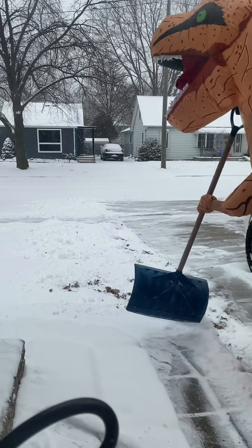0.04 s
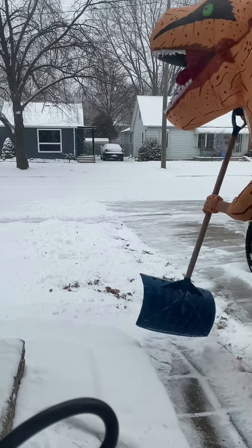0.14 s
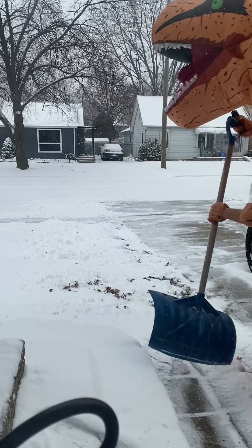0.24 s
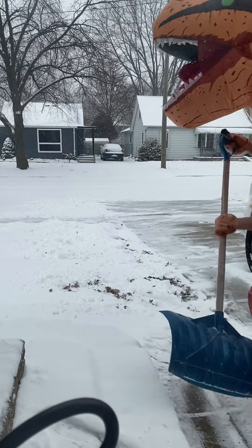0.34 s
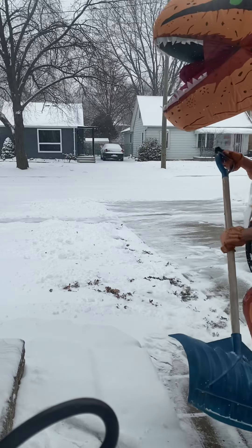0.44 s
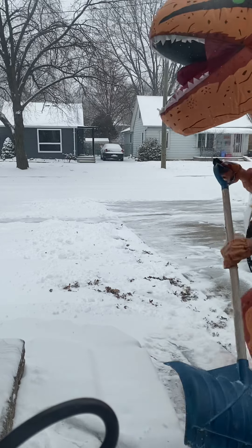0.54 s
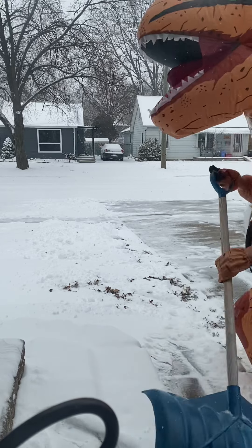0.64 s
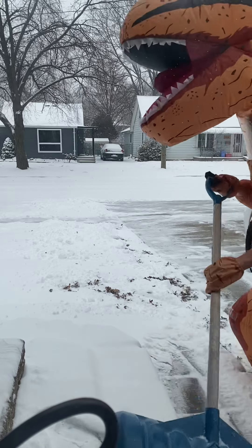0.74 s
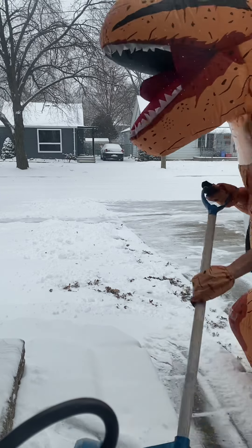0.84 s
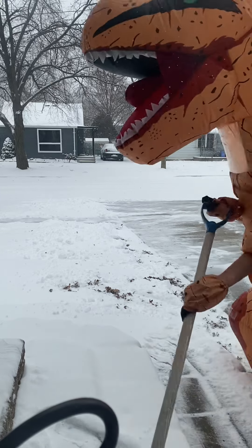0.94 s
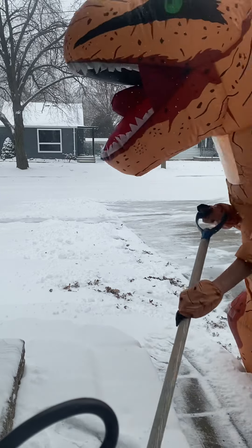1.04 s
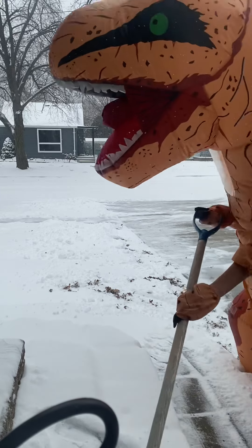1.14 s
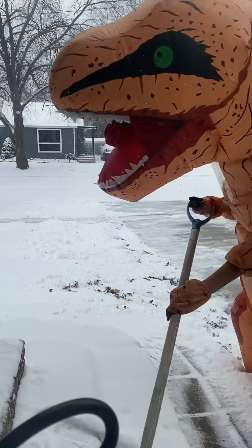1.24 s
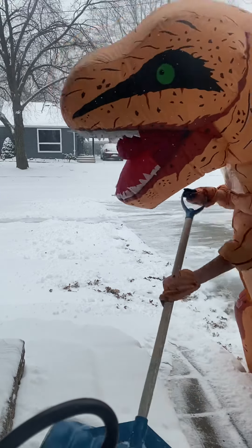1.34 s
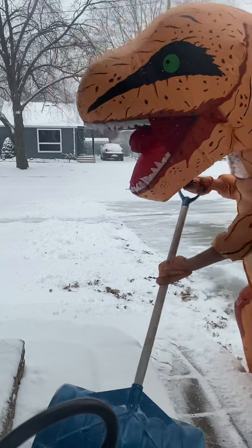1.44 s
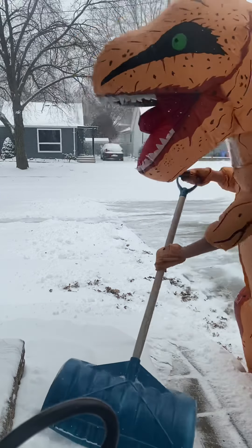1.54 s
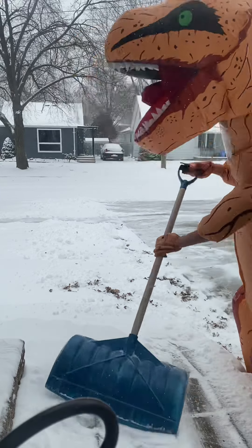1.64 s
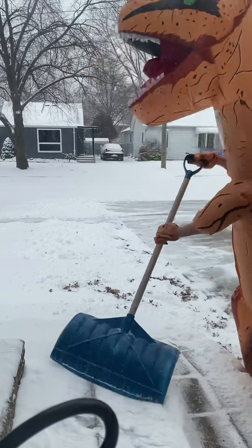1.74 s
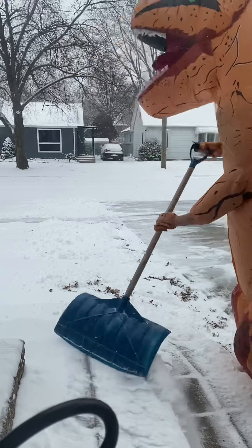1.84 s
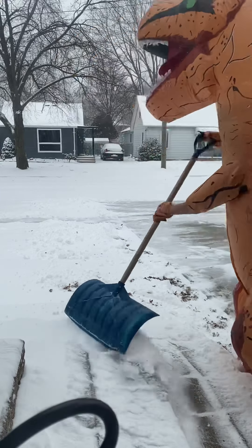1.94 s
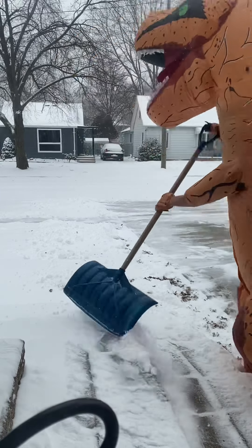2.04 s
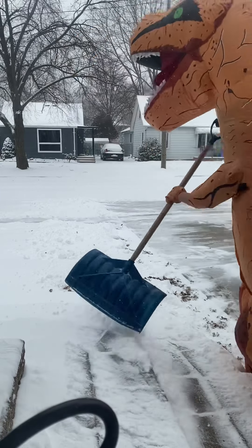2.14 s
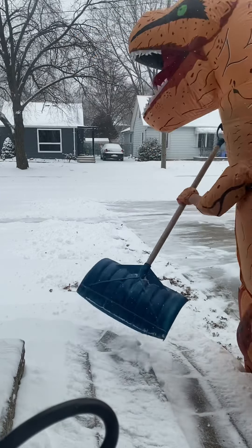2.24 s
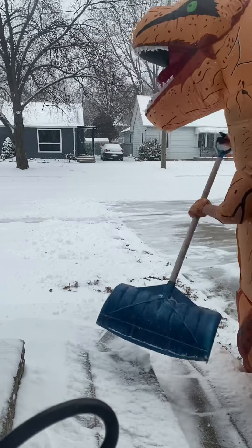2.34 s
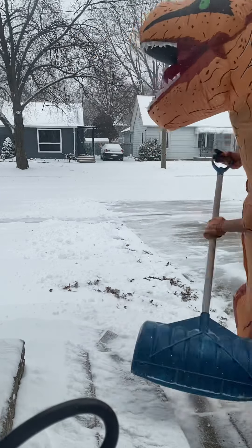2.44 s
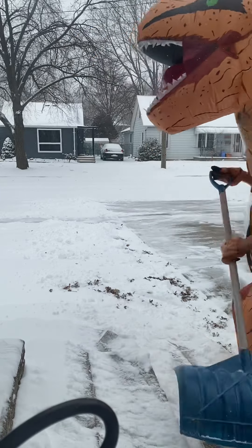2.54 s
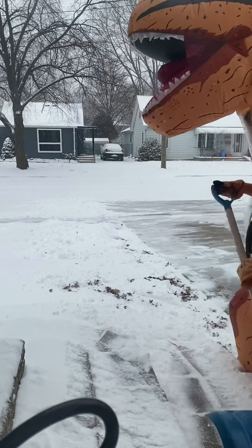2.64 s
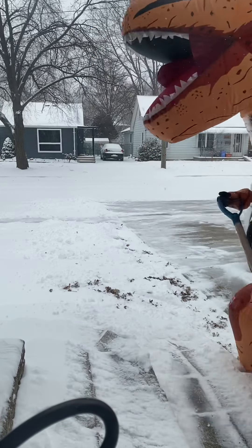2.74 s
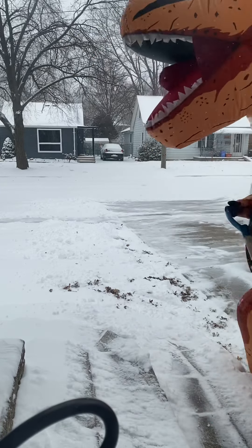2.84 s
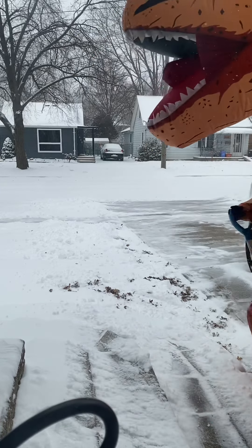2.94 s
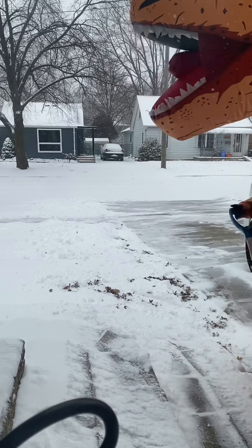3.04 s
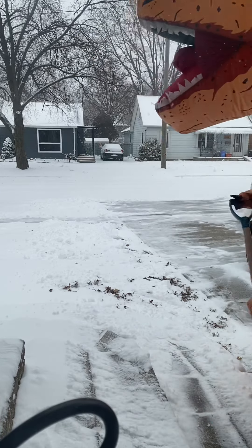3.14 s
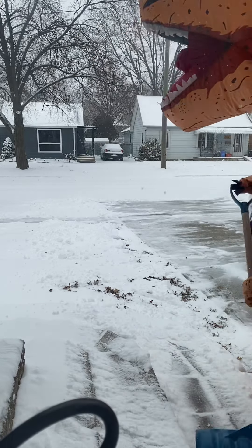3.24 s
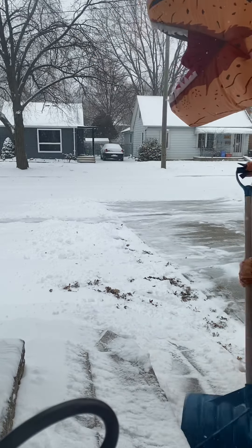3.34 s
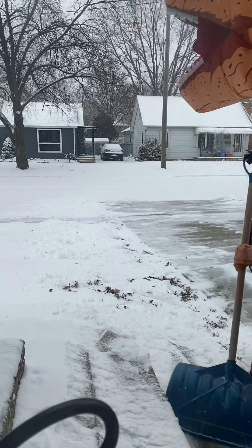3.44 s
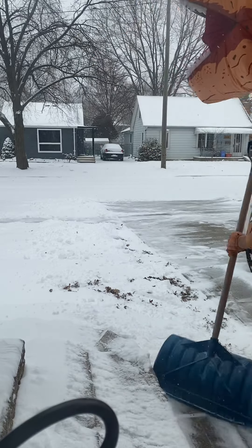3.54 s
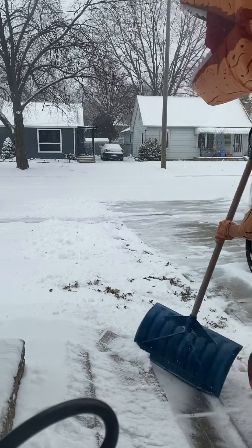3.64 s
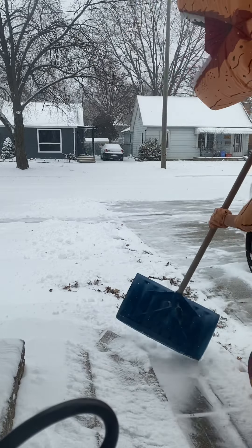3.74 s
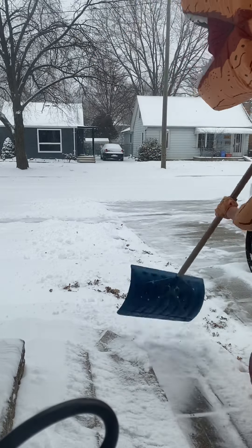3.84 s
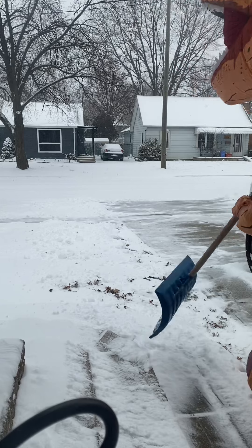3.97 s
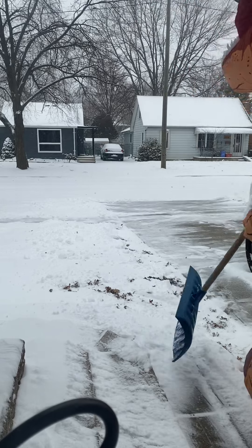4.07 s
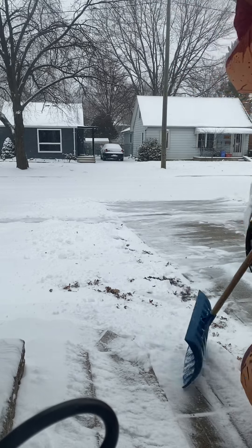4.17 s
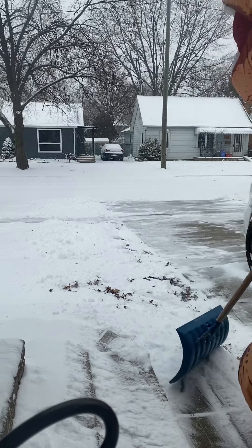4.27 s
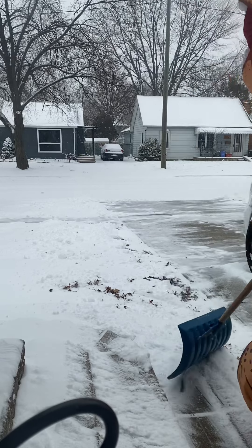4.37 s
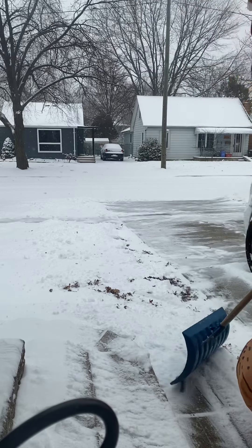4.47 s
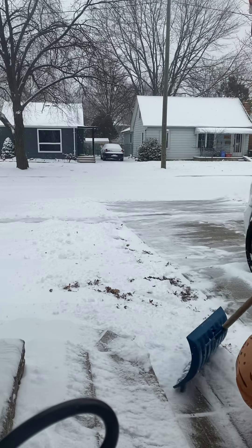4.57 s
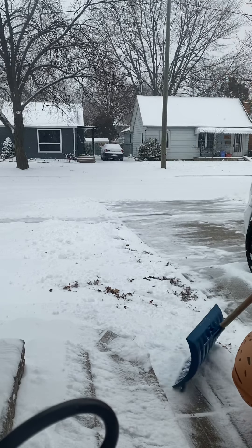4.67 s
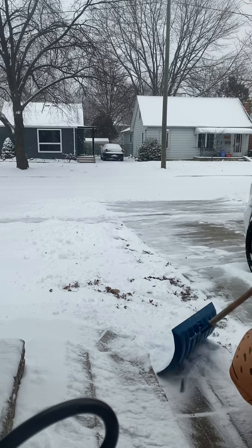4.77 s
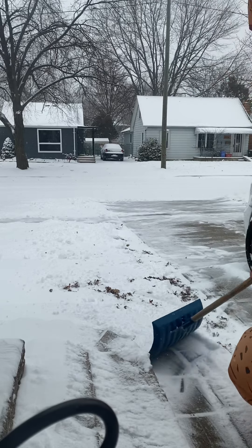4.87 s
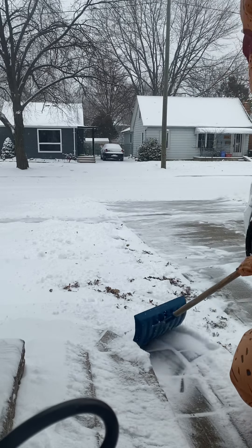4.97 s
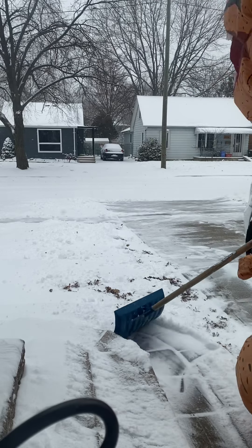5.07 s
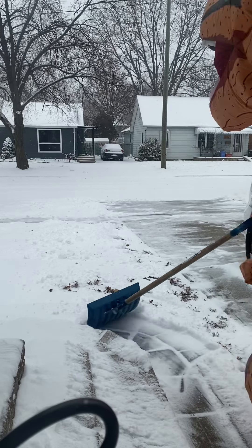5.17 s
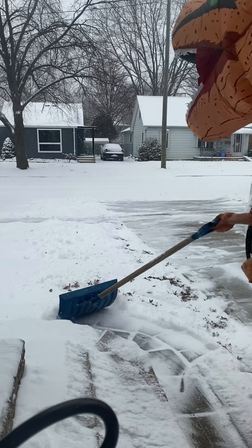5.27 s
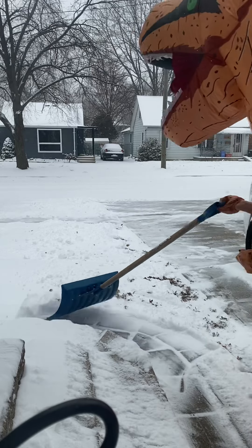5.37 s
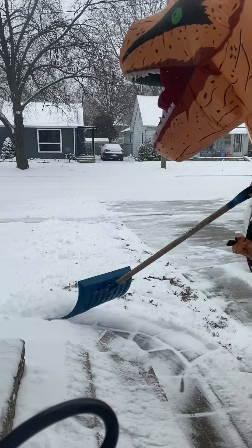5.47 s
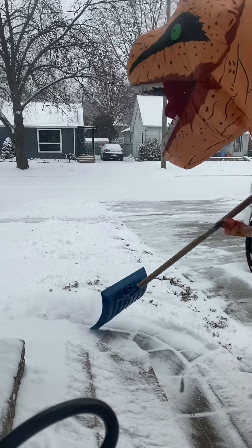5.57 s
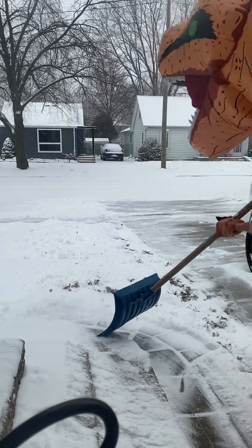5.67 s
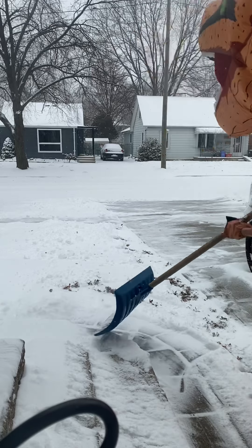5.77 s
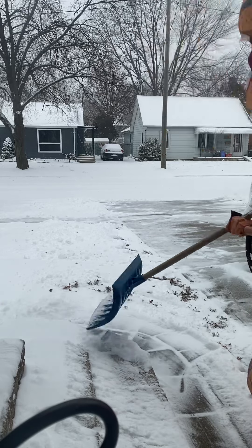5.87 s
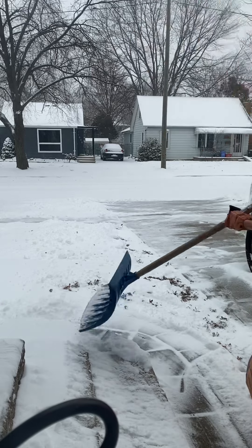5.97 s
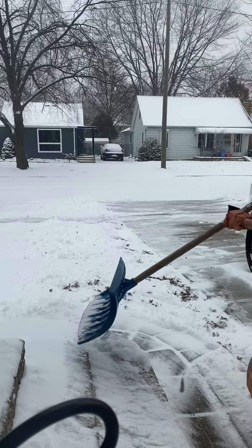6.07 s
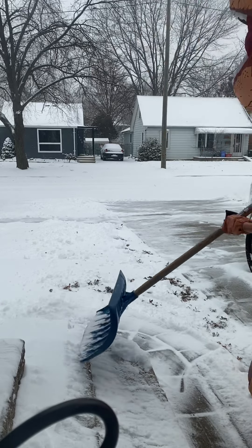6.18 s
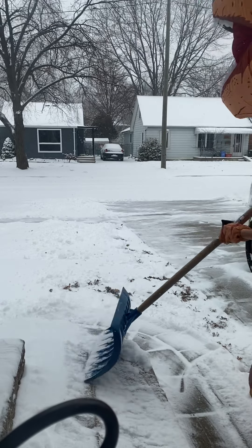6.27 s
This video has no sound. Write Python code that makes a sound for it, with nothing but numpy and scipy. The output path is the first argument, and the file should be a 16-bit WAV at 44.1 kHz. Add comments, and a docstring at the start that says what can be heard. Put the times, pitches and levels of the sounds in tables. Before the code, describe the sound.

A plastic snow shovel thumps down on snowy concrete and scrapes through two strong, hollow, gritty pushes, then only faint scuffs and fabric rustle remain.

```python
"""Plastic snow shovel on concrete

A shovel is set down and pushed through thin snow in two strong strokes, with light scuffs between and after them.
Random slips drive the blade's modes (boom) and are filtered into snow crunch and grit rasp; catches jolt it.
Landings and knocks add thumps, cracks and singing tones; thrown snow patters down.
Beneath lie a low outdoor rumble and the fabric hiss and blower hum of the shoveller's inflatable suit.
"""
import sys
import numpy as np
from scipy import signal
from scipy.fft import rfft, irfft
from scipy.io import wavfile
from scipy.ndimage import uniform_filter1d

SR = 44100
rng = np.random.default_rng(int(sys.argv[2]) if len(sys.argv) > 2 else 0)


def to_wav(s):
    """Save 16-bit WAV."""
    ch = np.atleast_2d(s).T  # columns
    pcm = np.round(np.clip(ch, -1, 1) * 32767)  # PCM
    wavfile.write(sys.argv[1], SR, pcm.astype(np.int16))


N = 278271
TIME = np.arange(N) / SR

# crushed-snow filter: (frequency [Hz], gain [dB])
CRUNCH_SPECTRUM = [(100, -33), (350, -7), (520, 11), (580, -0.5), (650, 6), (850, -6), (1050, -11.5),
                   (1500, -12.5), (1800, -25.5), (2300, -13.5), (4500, -63.5)]


def scraping(boom_db=-3.0, crunch_db=-7.5, rasp_db=-4.5, catch_db=-7.0, catch_crunch_db=-4.5,
             jolt_lag_s=0.0016, flex_hz=150):
    """Coarse slips drive the blade and crush snow; fine grit rasps under the edge; catches flare and jolt."""
    # edge catches on concrete: (time [s], relative rasp level [dB], blade jolt level [dB])
    catches = [(1.098, -48, -41.5), (1.181, -36, -33), (1.243, -35, -21.5), (1.325, -32.5, -16),
               (1.429, -38.5, -42), (1.491, -41, -16.5), (1.594, -34.5, -25.5), (1.651, -38, -16.5),
               (1.748, -38.5, -34), (1.802, -35.5, -19.5), (1.888, -38, -19.5), (1.987, -46.5, -35),
               (2.386, -62, -57), (3.053, -38.5, -36.5), (3.12, -32, -30), (3.168, -33.5, -31),
               (3.222, -32.5, -29), (3.336, -36, -17.5), (3.439, -57, -20), (3.628, -36.5, -31),
               (3.686, -43, -31), (4.187, -50, -48), (4.667, -57, -46), (4.773, -53.5, -52),
               (5.099, -41.5, -53), (5.577, -51, -42.5), (5.852, -62, -53)]
    rise_s, fall_s = 0.0076, 0.015  # bites quickly, lets go more slowly
    boom, crunch, rasp = push_gains()

    slips = grains(per_s=900, spread_db=3.0)
    grit = grains(per_s=2600, spread_db=2.5) + 0.71 * slips
    flares = sum(from_db(db + catch_db) * flare(s, rise_s, fall_s) for s, db, _ in catches)

    chatter = blade(high_pass(slips, flex_hz, order=2))  # small slips barely bend the shaft
    crushed = colour(slips + grains(per_s=2500, spread_db=2.0), CRUNCH_SPECTRUM)
    crunch_gain = np.hypot(from_db(crunch_db) * crunch, from_db(catch_crunch_db) * flares)
    rasp_gain = np.hypot(from_db(rasp_db) * rasp, flares)

    out = from_db(boom_db) * boom * steady(chatter, window_s=0.016)
    out += crunch_gain * steady(crushed, window_s=0.2)
    out += rasp_gain * steady(edge(grit), window_s=0.031)
    jolts = blows([(s + jolt_lag_s, jolt_db) for s, _, jolt_db in catches])
    return out + high_pass(jolts, flex_hz, order=2)


def push_gains():
    """Blade load sets the boom and grip on concrete the rasp; the crunch follows both."""
    # long pushes, one list each: (time [s], relative boom level [dB], relative rasp level [dB])
    pushes = [
        [(1.03, -36.5, -75.5), (1.14, -34.5, -51.5), (1.18, -26, -54.5), (1.38, -24.5, -41.5),
         (1.56, -25.5, -43), (1.7, -23, -43), (1.84, -30, -52.5), (1.99, -42, -57), (2.13, -75, -78.5)],
        [(2.93, -34, -69.5), (2.99, -37.5, -57.5), (3.11, -35, -41.5), (3.19, -23.5, -38.5), (3.36, -25.5, -41),
         (3.57, -29, -46), (3.7, -31, -55), (3.76, -51, -74), (3.9, -77, -85)],
    ]
    # light scuffs: (middle [s], half length to 1/e [s], relative boom level [dB], relative rasp level [dB])
    scuffs = [(2.497, 0.11, -56, -58), (2.632, 0.029, -58, -78), (4.279, 0.077, -57.5, -73),
              (4.73, 0.17, -51.5, -61.5), (5.018, 0.057, -51.5, -69.5), (5.203, 0.096, -44, -56),
              (5.494, 0.04, -57, -60.5), (5.616, 0.073, -52, -59.5), (5.823, 0.17, -58.5, -72.5)]
    push_fade_s, grip_share = 0.042, 0.37  # the rest of the crunch follows load
    gains = np.zeros((2, N))
    for rows in pushes:
        s, *levels = np.transpose(rows)
        outside_s = np.maximum(s[0] - TIME, 0) + np.maximum(TIME - s[-1], 0)
        fade = np.exp(-(outside_s / push_fade_s) ** 2)
        gains += from_db([np.interp(TIME, s, db) for db in levels]) * fade
    for s, half_s, boom_db, rasp_db in scuffs:
        gains += from_db([[boom_db], [rasp_db]]) * swell(s, half_s)
    boom, rasp = gains
    return boom, boom ** (1 - grip_share) * rasp ** grip_share, rasp


def blade(force, contact_hz=1300):
    """Parallel blade and shaft modes, alternating in sign; soft plastic dulls each contact."""
    # blade and shaft modes: (frequency [Hz], width [Hz], gain [dB])
    modes = [(81, 31, -4), (122, 22, -10), (155.5, 25, -4.5), (202.5, 24, -2), (251.3, 15.5, 0.5),
             (282.4, 23.8, 0.5), (334.1, 15, 4.5), (373, 66, -13.5), (395.1, 13.1, -1), (443.3, 20, -5.5),
             (475.3, 14, -6.5), (532.2, 30.5, -10), (621.6, 13, -11.5), (694, 25, -18), (756, 11, -17.5),
             (892.5, 15, -19)]
    lowpass = signal.butter(2, contact_hz, fs=SR, output="sos")
    force = signal.sosfilt(lowpass, force + 1e-18)
    out = np.zeros(len(force))
    for k, (hz, width_hz, db) in enumerate(modes):
        out += (-1) ** k * from_db(db) * resonance(force, hz, width_hz)
    return out


def blows(rows):
    """Impulses (time [s], peak [dB]) excite the blade; a lone blow peaks at its listed level."""
    force = np.zeros(N + SR)
    for s, db in rows:
        force[int(s * SR)] += from_db(db)
    unit_peak = np.abs(blade(signal.unit_impulse(N))).max()
    return blade(force[:N]) / unit_peak


def edge(force, patchy_db=4.5, count=40):
    """The contact point wanders along the edge, so its many high modes swell and fade by turns."""
    # grit filter: (frequency [Hz], gain [dB])
    grit_spectrum = [(500, -24.5), (1400, -12), (1950, -6.5), (2330, 2), (2560, -3), (2780, -7), (3000, -2),
                     (3320, -4.5), (3750, -17.5), (4400, -19.5), (4850, -32.5), (7600, -43)]
    out = np.zeros(N)
    for k, hz in enumerate(np.geomspace(900, 7400, count)):
        patchiness = from_db(patchy_db * drift(per_s=30))
        out += (-1) ** k * patchiness * resonance(force, hz, 0.04 * hz)
    return colour(out, grit_spectrum)


def knocking(crunch_db=14.0, rise_s=0.015):
    """Each impact thumps the blade and crushes a burst of snow and grit."""
    rows = impacts()
    burst_power = np.zeros(N)
    for s, _, crack_db, decay_s in rows:
        age_s = np.maximum(TIME - s, 0)
        decay = np.exp(-np.minimum(age_s / decay_s, 20))
        burst_power += (from_db(crack_db) * (1 - np.exp(-age_s / rise_s)) * decay) ** 2
    crushed = grains(per_s=6900, spread_db=5.0)
    lowpass = signal.butter(4, 3600, fs=SR, output="sos")
    muffled = signal.sosfilt(lowpass, edge(crushed))  # snow cushions the landing
    crack = steady(muffled, window_s=0.015)
    crack += from_db(crunch_db) * steady(colour(crushed, CRUNCH_SPECTRUM), window_s=0.045)
    return blows([row[:2] for row in rows]) + np.sqrt(burst_power) * crack


def impacts():
    """Rows (s, thump dB, crack dB, decay s): a knock is one blow; a landing is touch, hit, rebound, settling."""
    # edge hits a ridge: (time [s], thump level [dB], relative crack level [dB])
    knocks = [(1.44, -28, -31.5), (1.654, -27, -34), (2.594, -45.5, -61.5), (3.166, -20.5, -33),
              (5.5, -42.5, -63)]
    # blade set down: (time [s], thump level [dB], relative crack level [dB], rebound delay [s],
    # rebound relative to thump [dB], settling relative to thump [dB])
    landings = [(0.915, -11.5, -37, .014, 3, -4.5), (2.845, -16.5, -45, 0.019, 0.5, -11),
                (5.104, -32, -61, 0.031, -2, -4), (6.256, -34.5, -49.5, .021, 2, -5)]
    knock_decay_s, landing_decay_s, settle_decay_s = 0.013, 0.017, 0.035
    touch_lead_s, touch_db, touch_crack_db = 0.00715, -7.5, -2  # one corner touches first
    rebound_crack_db = -12
    settle_s, settle_crack_db = 0.055, -18.5  # the blade settles into the snow
    rows = [(s, thump, crack, knock_decay_s) for s, thump, crack in knocks]
    for s, thump, crack, rebound_s, rebound_db, settle_db in landings:
        rows += [(s - touch_lead_s, thump + touch_db, crack + touch_crack_db, landing_decay_s),
                 (s, thump, crack, landing_decay_s),
                 (s + rebound_s, thump + rebound_db, crack + rebound_crack_db, landing_decay_s),
                 (s + settle_s, thump + settle_db, crack + settle_crack_db, settle_decay_s)]
    return rows


def singing():
    """After a tap or hard catch a single blade mode swells as a sine, then dies away."""
    # singing blade tones: (start [s], frequency [Hz], peak level [dB])
    tones = [(0.906, 690, -33), (0.913, 265.4, -24), (0.95, 336.3, -20), (1.358, 285.7, -27.5),
             (1.470, 327.6, -25.5), (1.668, 282.5, -18), (1.89, 332, -32), (2.838, 461.6, -27),
             (3.31, 267.4, -21.5), (3.458, 210.6, -25.5), (3.681, 345.7, -37), (4.187, 272.5, -41),
             (5.114, 265.5, -38)]
    rise_s = 0.026
    out = np.zeros(N)
    for s, hz, db in tones:
        age_s = np.maximum(TIME - s, 0)
        rises = np.minimum(age_s / rise_s, 20)
        envelope = (rises * np.exp(1 - rises)) ** 2
        out += from_db(db) * envelope * np.sin(2 * np.pi * hz * age_s)
    return out


def thrown_snow():
    """At the end of a push, loose snow flies off and lands in many soft grains."""
    # snow showers: (time [s], level [dB])
    throws = [(2.0, -64), (3.729, -56.5)]
    # patter filter: (frequency [Hz], gain [dB])
    patter_spectrum = [(200, -1), (550, -5), (900, 11), (1400, -0.5), (2200, -28), (4500, -53)]
    shower = sum(from_db(db) * flare(s, rise_s=0.034, fall_s=0.031) for s, db in throws)
    return shower * rms_one(colour(grains(per_s=3000, spread_db=5.5), patter_spectrum))


def background():
    """Outdoor rumble plus the suit's fabric and blower."""
    return rumble() + suit_fabric() + suit_blower()


def rumble():
    """Distant rumble: filtered noise with a slowly changing level."""
    # rumble level: (time [s], level [dB])
    level = [(0, -62), (.42, -59.5), (.75, -62.5), (2.1, -54), (2.35, -60.5), (3.8, -51.5), (4.1, -60),
             (5.2, -52.5), (6.1, -59.5), (6.3, -50.5)]
    # rumble filter: (frequency [Hz], gain [dB])
    spectrum = [(20, -35.5), (32, -21), (48, 0), (62, 3.5), (80, -15), (110, -7.5), (150, -16.5),
                (205, -13), (250, -18.5), (330, -23.5), (420, -25.5), (700, -37.5), (1200, -47),
                (4000, -59)]
    gain = from_db(np.interp(TIME, *np.transpose(level)))
    return gain * steady(colour(rng.standard_normal(N), spectrum), window_s=0.2)


def suit_fabric(rest_db=-85.5):
    """Dense tiny contacts hiss in the fabric and swell as the shoveller moves."""
    # rustles: (middle [s], half length to 1/e [s], level [dB])
    rustles = [(0.377, 0.12, -86), (2.148, 0.092, -89), (2.654, 0.21, -79.5), (3.956, 0.19, -82),
               (4.182, 0.096, -69), (4.668, 0.23, -67.5), (5.11, 0.16, -64), (5.667, 0.36, -69.5),
               (6.223, 0.032, -74)]
    # fabric filter: (frequency [Hz], gain [dB])
    spectrum = [(300, -10.5), (900, -23.5), (1800, -10), (2300, 5.5), (2550, -0.5), (2760, -4), (3150, 6),
                (3400, -3), (3700, -14), (5000, -25), (8000, -43.5)]
    gain = from_db(rest_db) + sum(from_db(db) * swell(s, half_s) for s, half_s, db in rustles)
    return gain * rms_one(colour(grains(per_s=22000, spread_db=6.0), spectrum))


def suit_blower(waver=0.45, waver_rad=0.52):
    """Two hum tones and a rising thin whine waver in level and phase."""
    # steady blower tones: (frequency [Hz], RMS level before waver [dB])
    hum = [(59.2, -65), (193.8, -67)]
    # creeping whine: (time [s], frequency [Hz], RMS level before waver [dB])
    whine = [(0, 826, -96), (2.5, 860, -92), (6.3, 890, -87)]
    s, whine_hz, whine_db = np.transpose(whine)
    whine_tone = (np.interp(TIME, s, whine_hz), np.interp(TIME, s, whine_db))
    out = np.zeros(N)
    for hz, db in hum + [whine_tone]:
        phase = 2 * np.pi * np.cumsum(hz * np.ones(N)) / SR
        phase += waver_rad * hz / hum[1][0] * drift(per_s=16)  # high tones waver most
        out += np.sqrt(2) * from_db(db) * (1 + waver * drift(per_s=5.3)) * np.sin(phase)
    return out


def reflections(x, t60_s, delay_s):
    """A dense cloud of echoes that dies away; unit power gain."""
    age_s = np.arange(SR) / SR - delay_s
    decay = from_db(-60 * np.maximum(age_s, 0) / t60_s)
    echoes = rng.standard_normal(SR) * (age_s > 0) * decay
    return signal.fftconvolve(x, echoes / np.linalg.norm(echoes))[:N]


def grains(per_s, spread_db):
    """Tiny contacts at random moments, a few much stronger than the rest; unit power."""
    sizes = from_db(spread_db * np.minimum(rng.exponential(1, N), 4))
    return rms_one((rng.random(N) < per_s / SR) * sizes * rng.choice([-1, 1], N))


def drift(per_s):
    """Slow random curve with unit RMS, interpolated between random knots."""
    knots = rng.standard_normal(size=1024)
    return rms_one(np.interp(TIME * per_s, np.arange(len(knots)), knots))


def swell(middle_s, half_s, steepness=2.05):
    """A smooth rise and fall with a rounded top of 1."""
    return np.exp(-np.minimum(np.abs(TIME - middle_s) / half_s, 4) ** steepness)


def flare(s, rise_s, fall_s):
    """Gaussian rise to 1 and fall, each with its own width."""
    distance = np.maximum((s - TIME) / rise_s, (TIME - s) / fall_s)
    return np.exp(-0.5 * np.minimum(distance, 10) ** 2)


def resonance(x, hz, width_hz):
    """One two-pole resonance with a peak gain of about 1."""
    r = np.exp(-np.pi * width_hz / SR)
    gain = (1 - r * r) / 2
    return signal.lfilter([gain, 0, -gain], [1, -2 * r * np.cos(2 * np.pi * hz / SR), r * r], x + 1e-18)


def high_pass(x, hz, order):
    """Cut the bass."""
    return signal.sosfilt(signal.butter(order, hz, "high", fs=SR, output="sos"), x)


def colour(x, spectrum, size=8192):
    """Causal (minimum-phase) filter with the given spectrum, built by folding the cepstrum."""
    gain = from_db(at_hz(spectrum, np.arange(size // 2 + 1) * SR / size))
    cepstrum = irfft(np.log(gain))
    cepstrum[1:size // 2] *= 2
    cepstrum[size // 2 + 1:] = 0
    return signal.fftconvolve(x, irfft(np.exp(rfft(cepstrum))))[:N]


def at_hz(points, hz):
    """Read a spectrum on a log-frequency axis."""
    f, value = np.transpose(points)
    return np.interp(np.log(np.maximum(hz, 1)), np.log(f), value)


def steady(x, window_s):
    """Hold the running level near 1, keeping faster flutter."""
    size = max(int(window_s * SR), 2)
    power = uniform_filter1d(uniform_filter1d(x ** 2, size), size)
    return x / np.sqrt(np.abs(power) + 1e-4 * np.mean(x ** 2))


def rms_one(x):
    """Scale to unit power."""
    return x / np.sqrt(np.mean(x ** 2) + 1e-20)


def from_db(db):
    """Decibels to gain."""
    return 10 ** (np.asarray(db) / 20)


def scene(yard_db=-14.5, side_db=-4.5):
    """Shovel, dull yard echoes and background in mid; independent draws, scattered, form the side."""
    # yard echo filter: (frequency [Hz], gain [dB])
    yard = [(100, -5.5), (300, 7), (700, -6.5), (1400, 5), (2200, -0.5), (5000, -23)]
    # sideways scatter by ground and house: (frequency [Hz], gain [dB])
    scatter = [(60, -45.5), (200, -5), (370, -15.5), (520, -2), (700, -2), (1250, 10.5), (1700, -7.5),
               (2300, -2.5), (3200, -4), (4200, 7.5), (7000, 1.5)]
    # stereo lean: (frequency [Hz], left over right [dB])
    lean = [(100, 0), (400, -.4), (650, 1.5), (1600, 2.5), (2600, -2), (3300, -3), (4200, -2)]
    shovel = scraping() + knocking() + singing() + thrown_snow()
    echoes = colour(reflections(shovel, t60_s=0.25, delay_s=0.028), yard)
    mid = shovel + from_db(yard_db) * echoes + background()

    # the two ends of the wide edge meet different grit
    other_grit = scraping() + knocking() + thrown_snow() + background()
    side = from_db(side_db) * colour(reflections(other_grit, t60_s=0.017, delay_s=0), scatter)
    left = colour(mid + side, [(hz, db / 2) for hz, db in lean])
    right = colour(mid - side, [(hz, -db / 2) for hz, db in lean])
    right_late = np.interp(np.arange(N) - 2, np.arange(N), right)  # 2 samples after the left
    return np.array([left, right_late])


def record(dry, bass_hz=38, cutoff_hz=7700):
    """The microphone loses the deepest bass; the top is cut steeply."""
    lowpass = signal.ellip(10, 0.1, 80, cutoff_hz, fs=SR, output="sos")
    return signal.sosfilt(lowpass, high_pass(dry, bass_hz, order=4))


dry = scene()
out = record(dry)
to_wav(out)
```